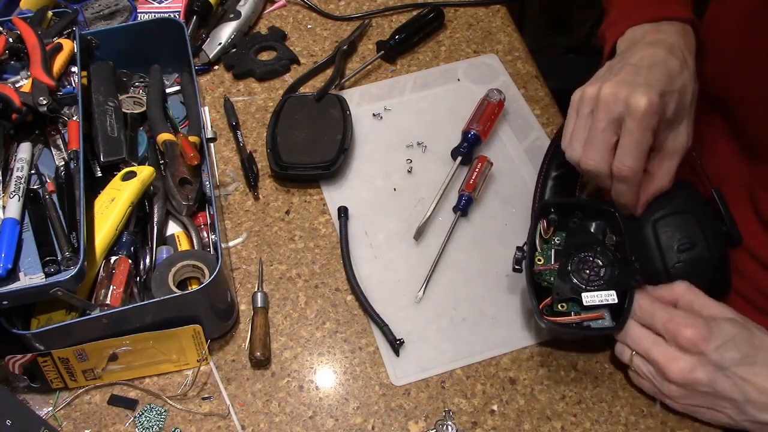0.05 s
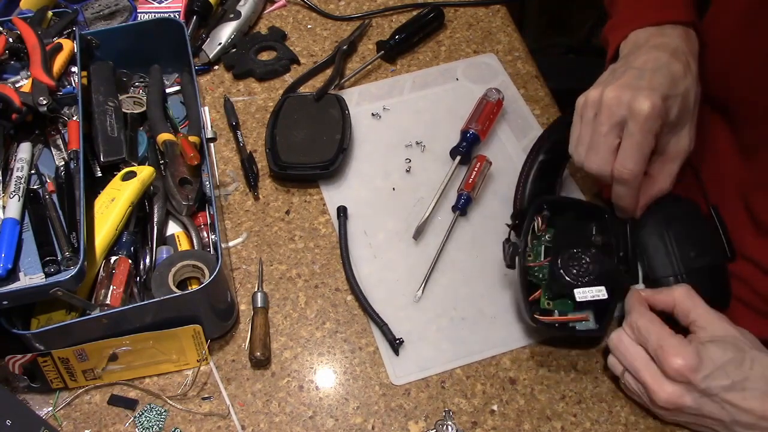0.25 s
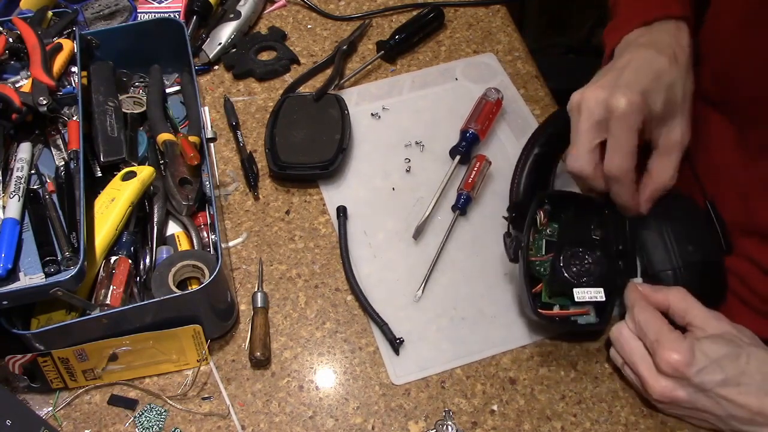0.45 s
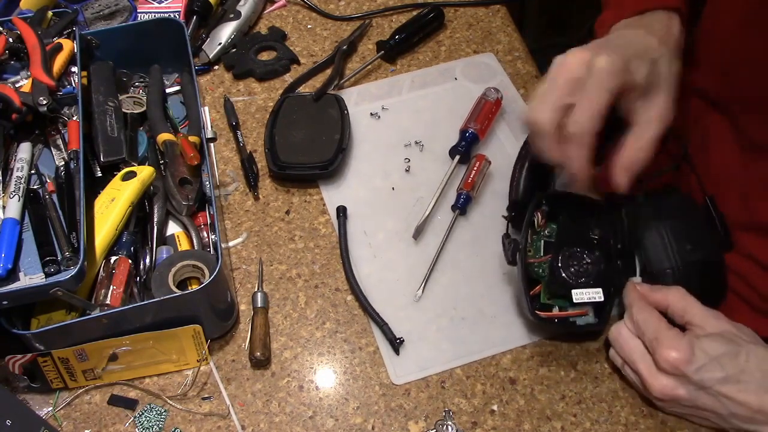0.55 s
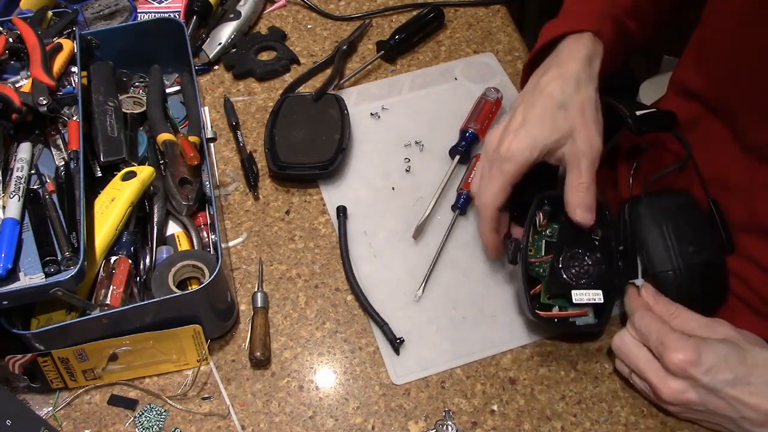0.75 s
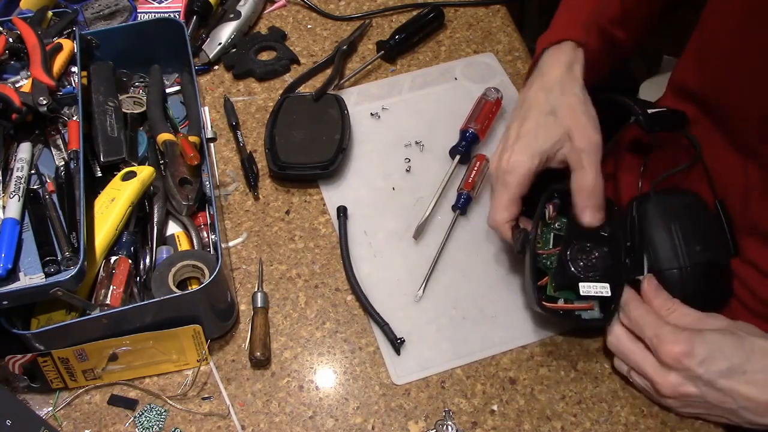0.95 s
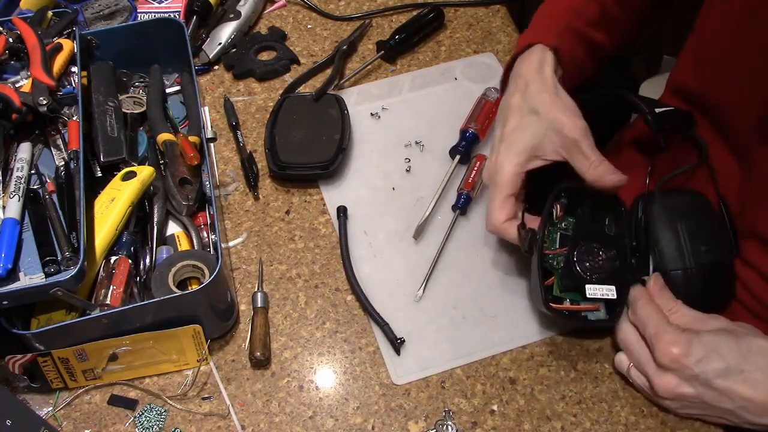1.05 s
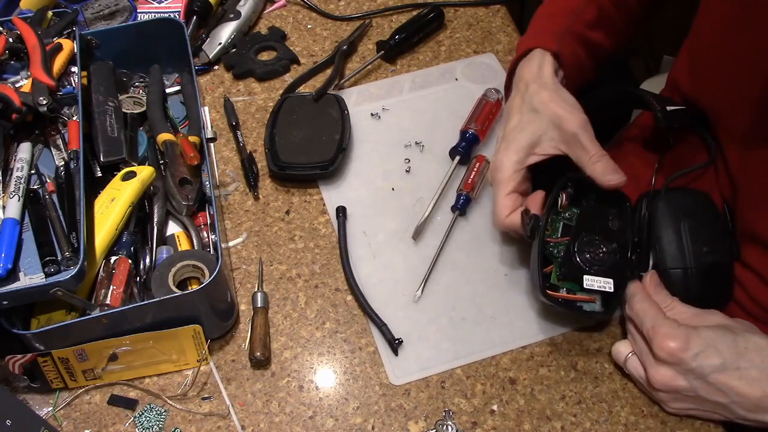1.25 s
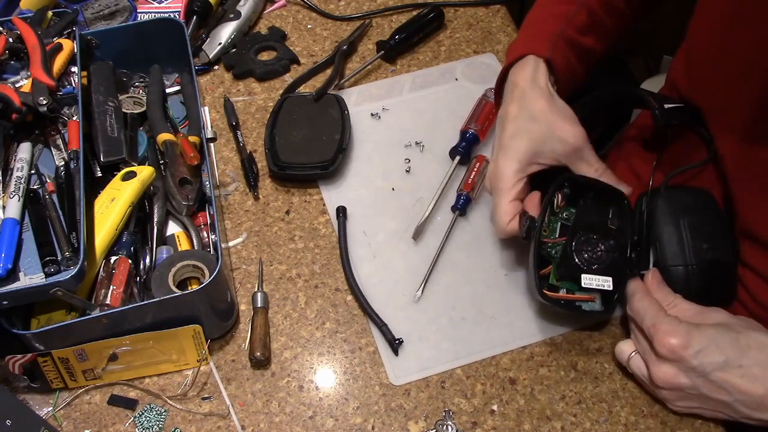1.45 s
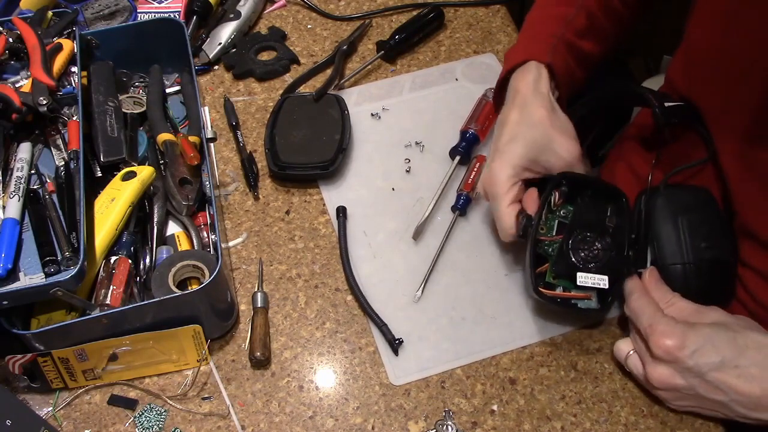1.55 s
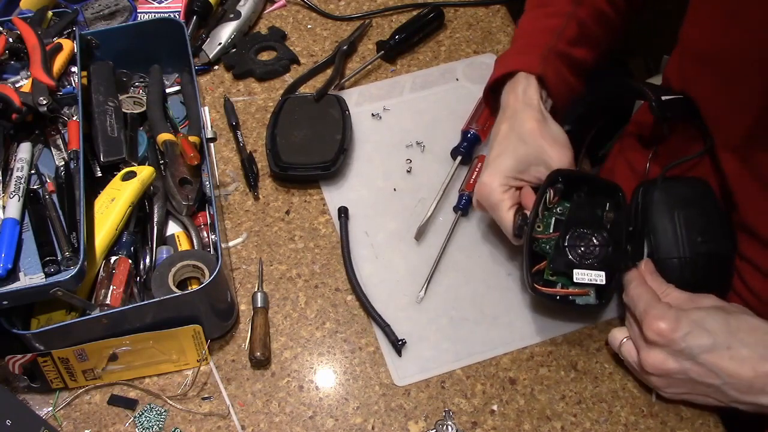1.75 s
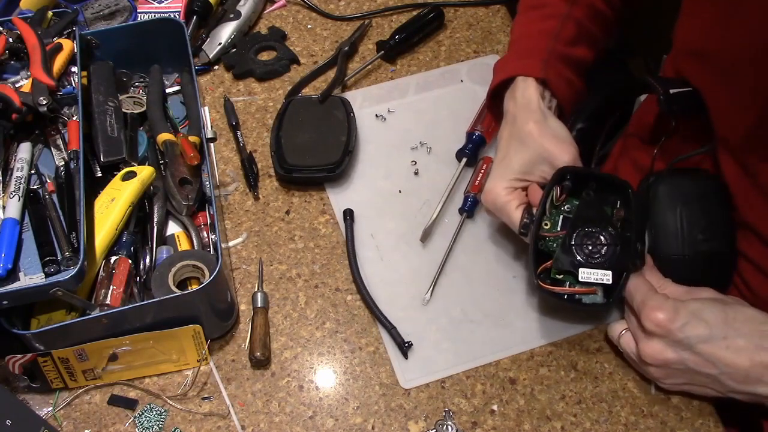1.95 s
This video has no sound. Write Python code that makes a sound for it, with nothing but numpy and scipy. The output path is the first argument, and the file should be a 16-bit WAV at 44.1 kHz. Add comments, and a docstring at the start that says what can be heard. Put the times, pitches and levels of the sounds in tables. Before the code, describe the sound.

Plastic earmuffs clatter loudly on a workbench, then faint ticks, finger rubs and one sharp snap

```python
"""Plastic earmuffs on a workbench in a small room, close to a nearly mono microphone, for two seconds.
After a light click and nudge, the headband swings over and clatters down, thumping the bench. Then fingers
slide over the cups, which tick and creak as they are gripped, give one sharp snap at 1.25 s and tick on.
Blows are noise bursts with ringing modes, knocks and thumps are decaying sines, and fingers are grainy noise.
Room reflections and a steady hiss lie behind, a little wider than the handling."""
import sys
import numpy as np
from scipy import signal
from scipy.fft import rfft, irfft
from scipy.io import wavfile

SR = 44100
rng = np.random.default_rng(int(sys.argv[2]) if len(sys.argv) > 2 else 0)


def unload_audio(sound):
    """Save the sound as a 16-bit wav file, at the path given as the first command line argument."""
    columns = np.transpose(np.atleast_2d(sound))
    # keep every value between -1 and 1, then stretch to whole-number steps
    steps = np.round(np.clip(columns, -1, 1) * 32767)
    wavfile.write(sys.argv[1], SR, steps.astype(np.int16))


N = 88200  # two seconds of samples

# Centres of the four bands (low, mid, high, top) of every plastic or skin contact: (frequency [Hz])
CONTACT_BANDS_HZ = (600, 1500, 5000, 11000)
# The next three tables list blows before the shell high-pass, with band levels per octave:
# (time [s], resonance [Hz], boost [dB], low [dB], mid [dB], high [dB], top [dB], t60 [s])
# The headband clatters down
HEADBAND_CLATTER = [(.2317, 1140, 11.5, -23.5, -17.5, -16, -28, 0.015),
                    (.238, 3100, 8, -37, -12.5, -24, -29.5, 0.019),
                    (.2448, 6000, 15, -19.5, -14, -19, -18.5, 0.019),
                    (.2472, 3140, 6, -22.5, -12, -17, -20, 0.052),
                    (.2545, 760, 6.5, -15, -8, -40, -33, 0.071), (.262, 745, 7, -29, -18, -8, -17, 0.02),
                    (.267, 770, 6, -23, -27, -30, -33, 0.042),
                    (.2712, 3000, 13, -19, -24, -24.5, -31, 0.052),
                    (.2947, 2930, 13.5, -30.5, -10, -32, -44, .013),
                    (.2996, 1400, 4, -33, -25, -20.5, -27.5, 0.044),
                    (.3105, 1010, 3.5, -22, -10.5, -27, -44, 0.015)]
# Hard plastic parts click
PLASTIC_CLICKS = [(.0105, 2780, 7, -52, -43, -34, -40.5, 0.015),
                  (.194, 5070, 12.5, -56, -31.5, -44, -38.5, 0.021),
                  (.393, 12000, 1.5, -58, -50, -43, -30, .014),
                  (.3998, 2980, 6, -35, -36.5, -30.5, -37.5, 0.025),
                  (.4215, 1500, 9, -53, -34, -48, -44, 0.012),
                  (.4408, 6350, 17.5, -38, -27, -33, -37, 0.019),
                  (.4436, 2880, 16.5, -51, -25, -34.5, -36, 0.019),
                  (.4487, 5900, 21.5, -28, -42, -43.5, -49, 0.04),
                  (.4555, 7500, 8, -58, -28, -35, -39, 0.034), (.4668, 1040, 0, -45, -22, -30, -36, 0.02),
                  (.81, 2500, 4, -40, -43, -53, -62, 0.032), (1.003, 8000, 10, -65, -57, -48, -53, 0.021),
                  (1.036, 6300, 18, -65, -38, -48, -54, 0.018),
                  (1.2450, 8840, 13, -37, -32, -31.5, -38, .018),
                  (1.2462, 2300, 11.5, -28, -22, -19, -44, 0.015),
                  (1.2505, 676, 3.5, -37.5, -26.5, -46, -52, 0.03)]
# The cup is nudged and rings
CUP_TAPS = [(.041, 388, 18.5, -49.5, -82, -62, -75, 0.059),
            (.534, 6400, 13.5, -52, -39, -47.5, -61.5, 0.067),
            (.637, 1890, 7.5, -66, -51.5, -61, -69, 0.035),
            (.7957, 1900, 10.5, -53, -39, -58.5, -63, 0.016), (.8432, 6400, 16, -56, -37, -53.5, -59, 0.05),
            (.9038, 1900, 6.5, -50, -38.5, -48, -61, 0.027),
            (.928, 1120, 10, -46.5, -37.5, -60, -66, 0.024), (1.046, 1900, 4, -41, -37.5, -50, -54, 0.023),
            (1.097, 1880, 7.5, -59, -47, -52, -59, 0.12), (1.172, 2500, 3, -64, -55, -62, -65, .025),
            (1.264, 1930, 20, -49, -43, -59, -60, 0.041), (1.2925, 1840, 13, -46, -36.5, -40.5, -49, 0.019),
            (1.3115, 6360, 12, -55, -53, -46, -58, .02),
            (1.3248, 1850, 12, -43.5, -41.5, -51.5, -62, 0.058),
            (1.471, 1810, 12, -59, -51.5, -54, -64, 0.046), (1.556, 1850, 9, -61, -50, -52.5, -65, .04),
            (1.674, 1900, 1, -60, -48, -51.5, -60, 0.042)]
# Modes of the whole frame: (frequency [Hz], level against the blow [dB], t60 [s])
FRAME_MODES = [(275, -17, .3), (444, -15, .22), (685, -17, .11), (735, -18, .18), (840, -16, .13),
               (1245, -17, .15), (1354, -15, .18), (1510, -21, .18), (1720, -24, .14), (1925, -23, .13),
               (2862, -25, .12), (3074, -19, .11), (4650, -27, .11), (6290, -27, .1), (8550, -26, .12)]
# Modes of one cup: (frequency [Hz], level against the blow [dB], t60 [s])
CUP_MODES = [(985, -7, .11), (1770, -13, .05), (1890, -10, .06), (2080, -14, .04), (3020, -14, .06),
             (4694, -14, .05), (6347, -13, .045)]
# Hollow knocks of a cup wall, with a run where it judders under the thumb:
# (time [s], pitch [Hz], level before the high-pass [dB], t60 [s])
CUP_KNOCKS = [(.041, 249, -41, 0.038), (.4668, 1043, -19.5, 0.033), (.7957, 1890, -28, 0.0092),
              (.928, 604, -29.5, 0.038), (.938, 680, -33.5, 0.05), (0.945, 458, -33, 0.038),
              (0.955, 355, -33.5, .04), (.964, 292, -43, 0.048), (1.249, 703, -30.5, 0.026),
              (1.2928, 1880, -30, 0.049)]
# The bench top is bumped: (time [s], level [dB])
BENCH_THUMPS = [(0.039, -51.5), (.262, -35), (.293, -40.5), (0.769, -54), (1.246, -50)]
# Boom modes of the bench top: (frequency [Hz], level against the bump [dB], t60 [s])
BENCH_MODES = [(73, -2, .24), (102, 0, .3), (128, -10, .25), (162, -9, .25)]
# Fingers slide on the shells, band levels per octave: (time [s], rise [s], fall by 30 dB [s],
# resonance [Hz], boost [dB], low [dB], mid [dB], high [dB], top [dB])
FINGER_RUBS = [(.034, 0.0047, 0.051, 280, 24, -56, -65, -66, -79),
               (.762, 0.0064, 0.11, 2670, 10, -63, -61, -47.5, -54),
               (.78, 0.065, 1, 283, 11.5, -59.5, -55.5, -56.5, -63.5),
               (.926, .004, .17, 1100, -1.5, -40, -41.5, -42.5, -58.5),
               (1.08, 0.12, 0.4, 2190, 6.5, -56, -59.5, -55.5, -61),
               (1.398, .02, 0.2, 2100, 7, -64, -63, -61.5, -65.5),
               (1.51, 0.074, 0.55, 4570, -4, -68, -58.5, -55.5, -69),
               (1.81, 0.039, 0.46, 1210, 6, -57.5, -55, -60, -64.5),
               (1.9, 0.047, 0.073, 1480, 13.5, -63, -54.5, -62, -67)]
# Tail of the small room: (band centre [Hz], t60 [s], level against the direct sound [dB])
ROOM_BANDS = [(151, 0.86, -9.5), (473, 0.42, -7.5), (1400, 0.41, -6.5), (3260, 0.37, -6.5),
              (7240, 0.24, -7.5), (14000, 0.29, -11.5)]
# Width of the room, as the gain of the side signal: (frequency [Hz], gain [dB])
SIDE_GAIN = [(30, -22), (70, -33), (140, -13), (300, -8), (650, -20), (1400, -20), (3000, -13.5),
             (6000, -11.5), (9000, -11.5), (13000, -32)]
# Spectrum shape of the room hiss: (frequency [Hz], relative level per Hz [dB])
HISS_SHAPE = [(15, -64), (25, -31.5), (130, -1.5), (206, -5.5), (242, -1.5), (354, -3.5), (607, -4.5),
              (677, -5), (988, -7.5), (5880, -21), (6380, -22), (8360, -23), (16000, -40)]

RESONANCE_OCT = 0.27  # half width of a contact's favoured resonance
BASS_DB_PER_OCT, TOP_DB_PER_OCT = 14, 25  # fall below the lowest and above the highest contact band
ATTACK_S = 0.00037
CLICK_RING_DB = -5
SHELL_CUT_HZ, KNOCK_CUT_HZ = 300, 170
RUB_GRAINS_PER_S, RUB_SCATTER_DB = 900, 3
ROOM_GAP_S = 0.0046  # silence before the tail
EARLY_DB, EARLY_S = -9, 0.0066  # level of the early reflections, time of their 30 dB decay factor
HISS_DB = -56.5  # rms level
CEILING, TOP_HZ = 1.9, 16200  # amplitude where peaks level off, and recorder cutoff


def amp(db):
    """Decibels to gain."""
    return 10 ** (np.asarray(db) / 20)


def clock(seconds):
    """Time axis in seconds."""
    return np.arange(int(seconds * SR)) / SR


def add(out, start, x):
    """Mix x into out at a time in seconds."""
    i = max(int(start * SR), 0)
    out[i:i + len(x)] += x[:len(out) - i]


def along(hz, points):
    """Read (frequency [Hz], value) points on a log-frequency axis."""
    f, v = np.array(points, float).T
    return np.interp(np.log(hz + 1), np.log(f), v)


def noise(gain, size):
    """Random-phase noise with the spectrum gain(Hz); a gain of 1 gives rms 1."""
    hz = np.fft.rfftfreq(size, 1 / SR) + 1
    phases = np.exp(2j * np.pi * rng.random(len(hz)))
    return irfft(gain(hz) * phases, size) * np.sqrt(size)


def fade(t, t60):
    """Exponential decay by 60 dB in t60 seconds."""
    return amp(-60 * t / max(t60, 1e-3))


def ring(modes, t):
    """Decaying modes, each struck at a chance phase."""
    out = np.zeros(len(t))
    for hz, db, t60 in modes:
        out += amp(db) * fade(t, t60) * np.sin(2 * np.pi * (hz * t + rng.random()))
    return out


def contact_db(hz, colour):
    """Octave level of a contact: four bands and one broad resonance, falling away at both ends."""
    peak_hz, peak_db, *band_dbs = colour
    octaves_below = np.maximum(np.log2(CONTACT_BANDS_HZ[0] / hz), 0)
    octaves_above = np.maximum(np.log2(hz / CONTACT_BANDS_HZ[-1]), 0)
    boost = peak_db / (1 + (np.log2(hz / peak_hz) / RESONANCE_OCT) ** 2)
    bands = along(hz, list(zip(CONTACT_BANDS_HZ, band_dbs)))
    return bands + boost - BASS_DB_PER_OCT * octaves_below - TOP_DB_PER_OCT * octaves_above


def contact(colour, size):
    """Noise for the dense, heavily damped vibration of plastic."""
    def gain(hz):
        """Spread each octave's power over its width in Hz."""
        return amp(contact_db(hz, colour)) * np.sqrt(SR / 2 / (hz * np.log(2)))
    return noise(gain, size)


def high_pass(x, hz):
    """Small shells radiate little bass."""
    return signal.sosfilt(signal.butter(3, hz, "high", fs=SR, output="sos"), x)


def blows(table, modes, ring_db):
    """Each blow is a short crack with the ring of the part that was hit, coloured by the same contact."""
    out, t = np.zeros(N), clock(.5)
    for start, *colour, t60 in table:
        crack = contact(colour, size=len(t)) * fade(t, t60)
        struck = [(hz, db + ring_db + contact_db(hz, colour), decay) for hz, db, decay in modes]
        tone = ring(struck, t)
        add(out, start, (crack + tone) * np.minimum(t / ATTACK_S, 1))
    return out


def knocks():
    """Each knock rings one well-damped resonance of the cup wall."""
    out, t = np.zeros(N), clock(.2)
    for start, hz, db, t60 in CUP_KNOCKS:
        add(out, start, ring([(hz, db, t60)], t) * np.minimum(t / ATTACK_S, 1))
    return out


def fingers():
    """Sliding skin: grainy friction that swells and dies away."""
    out, t = np.zeros(N), clock(0.96)
    for start, rise, fall, *colour in FINGER_RUBS:
        scatter = np.interp(t * RUB_GRAINS_PER_S, np.arange(len(t)), rng.standard_normal(len(t)))
        grain = amp(RUB_SCATTER_DB * scatter)
        grain = grain / np.sqrt(np.mean(grain ** 2))
        swell = np.minimum(t / max(rise, 1e-3), 1)
        shape = swell * fade(np.maximum(t - rise, 0), fall * 2)
        add(out, start, contact(colour, size=len(t)) * shape * grain)
    return out


def bench(rise_s=.008):
    """Low boom of the bench top: a few bass modes with a soft onset."""
    out, t = np.zeros(N), clock(.5)
    for start, db in BENCH_THUMPS:
        add(out, start, amp(db) * ring(BENCH_MODES, t) * np.minimum(t / rise_s, 1))
    return out


def room_response():
    """Quick reflections off the bench and tools, with a tail whose bands fade at their own rates."""
    t = clock(.5)
    tail = np.zeros(len(t))
    centres = [row[0] for row in ROOM_BANDS]
    # each row of the identity picks out one band, overlapping its neighbours
    for weights, (_, t60, db) in zip(np.eye(len(ROOM_BANDS)), ROOM_BANDS):
        shape = fade(t, t60) * (t > ROOM_GAP_S)
        band = noise(lambda hz: np.sqrt(along(hz, list(zip(centres, weights)))), size=len(t))
        tail += amp(db) * band * shape / np.linalg.norm(shape)
    early_shape = t * fade(t, 2 * EARLY_S)
    early = rng.standard_normal(len(t)) * early_shape / np.linalg.norm(early_shape)
    return tail + amp(EARLY_DB) * early


def background():
    """Steady room hiss: shaped noise set to one rms level."""
    hiss = noise(lambda hz: amp(along(hz, HISS_SHAPE)), size=N)
    return amp(HISS_DB) * hiss / hiss.std()


def scene():
    """All handling is in the centre; only the room and hiss have a little width."""
    shells = blows(HEADBAND_CLATTER, FRAME_MODES, ring_db=0)
    shells += blows(PLASTIC_CLICKS, FRAME_MODES, CLICK_RING_DB)
    shells += blows(CUP_TAPS, CUP_MODES, ring_db=0)
    close = high_pass(shells, SHELL_CUT_HZ) + high_pass(knocks(), KNOCK_CUT_HZ) + fingers() + bench()
    # independent room and hiss for the middle and the side
    middle, side = (signal.fftconvolve(close, room_response())[:N] + background() for _ in range(2))
    side = irfft(rfft(side) * amp(along(np.fft.rfftfreq(N, 1 / SR), SIDE_GAIN)), N)
    return np.array([close + middle + side, close + middle - side])


def record(dry):
    """The recorder rounds the loudest peaks and cuts the top."""
    rounded = CEILING * np.tanh(dry / CEILING)
    return signal.sosfilt(signal.ellip(8, .2, 70, TOP_HZ, fs=SR, output="sos"), rounded)


dry = scene()
out = record(dry)
unload_audio(out)
```